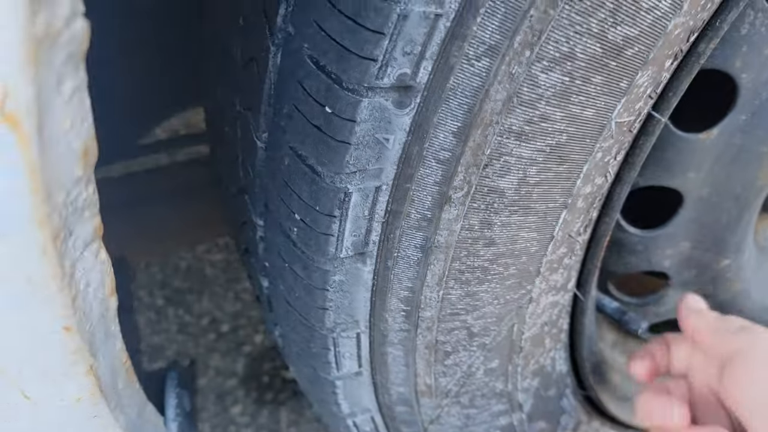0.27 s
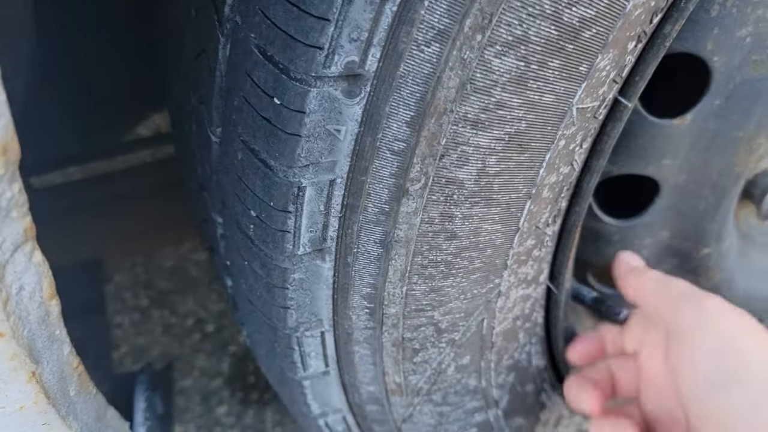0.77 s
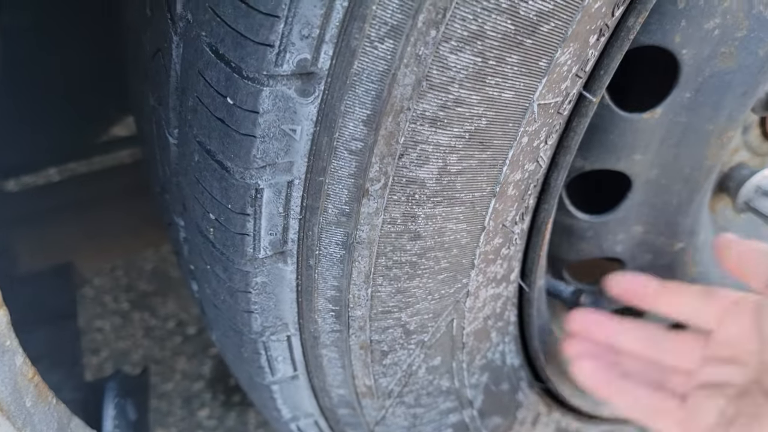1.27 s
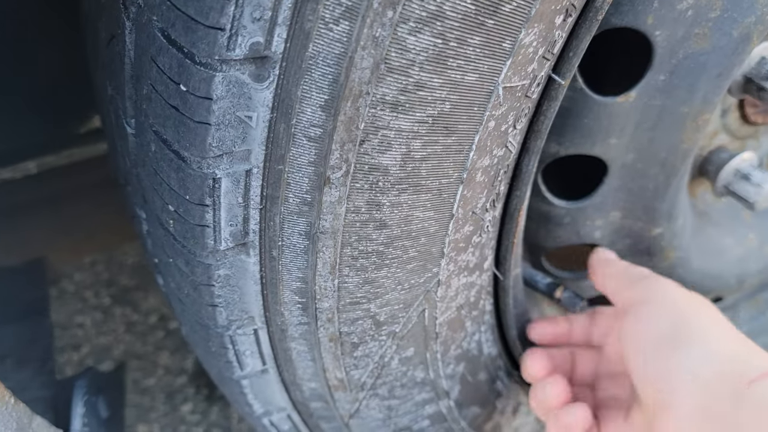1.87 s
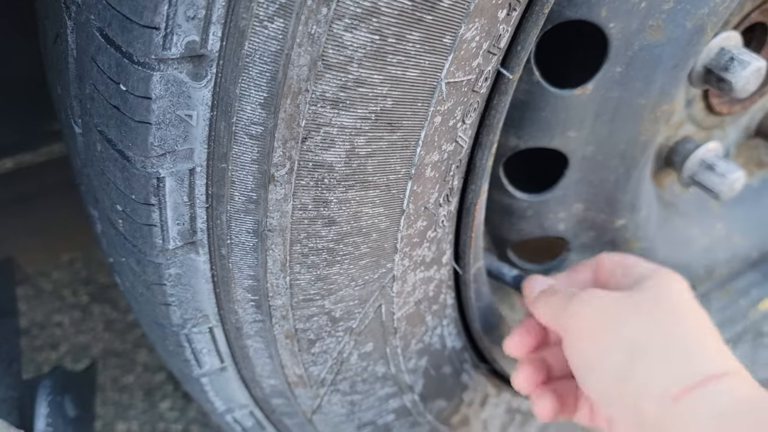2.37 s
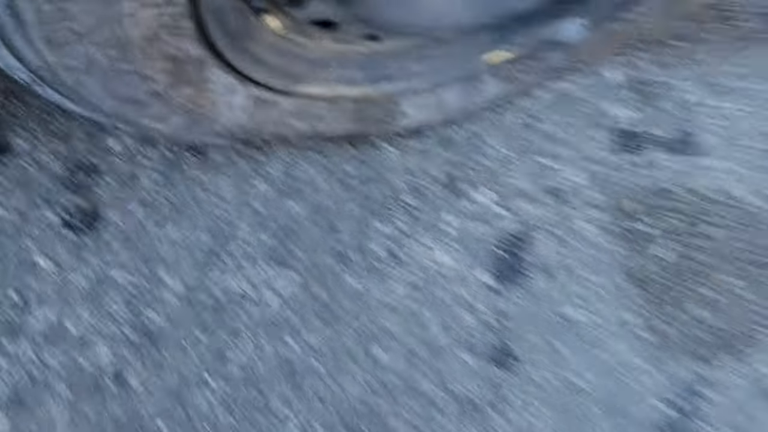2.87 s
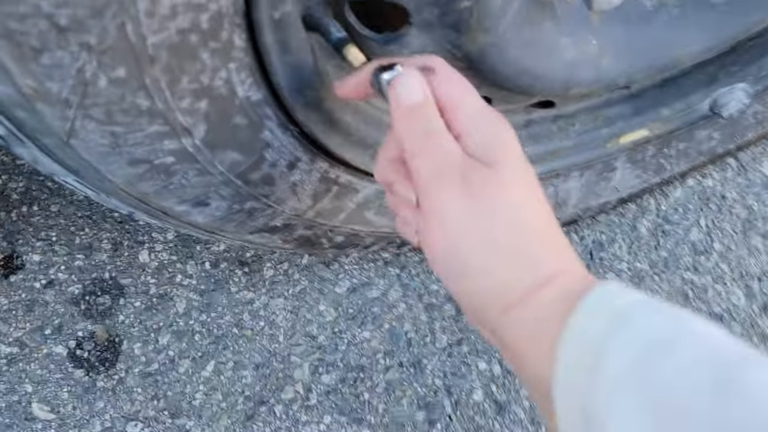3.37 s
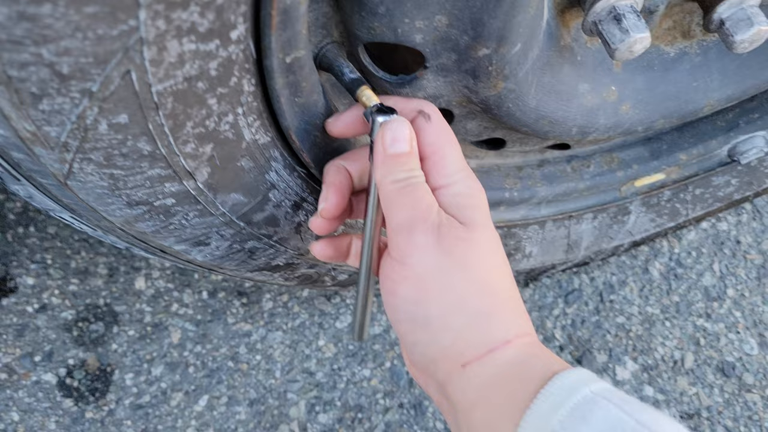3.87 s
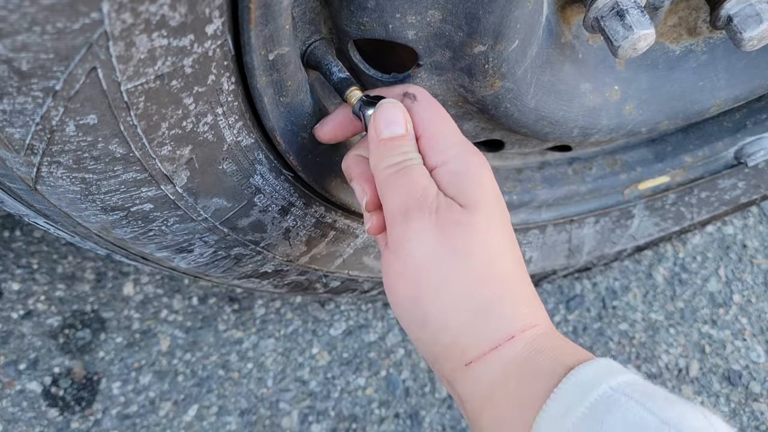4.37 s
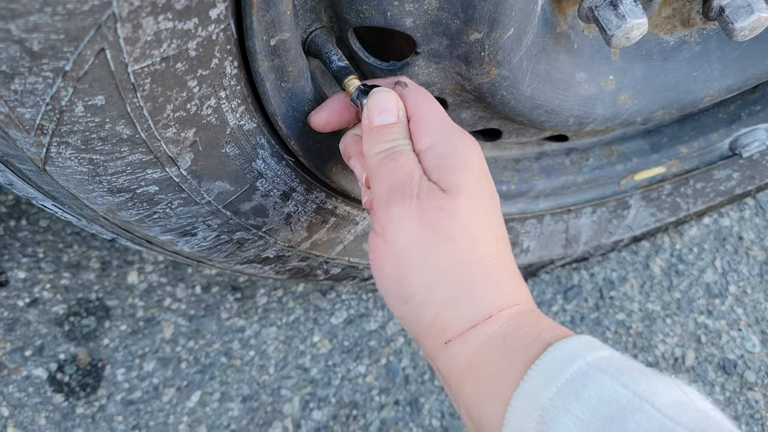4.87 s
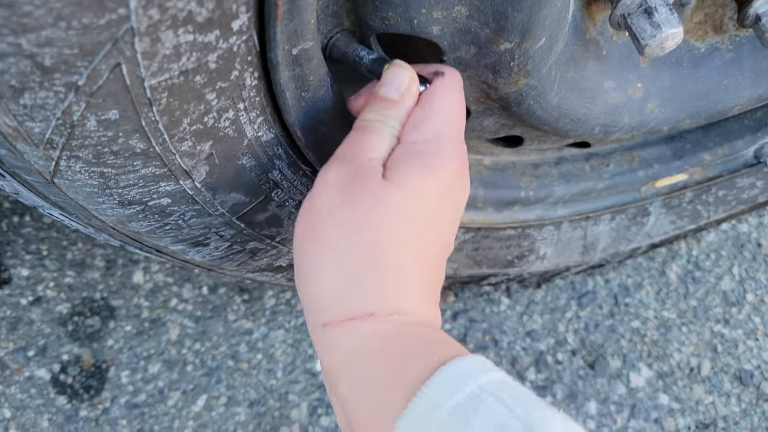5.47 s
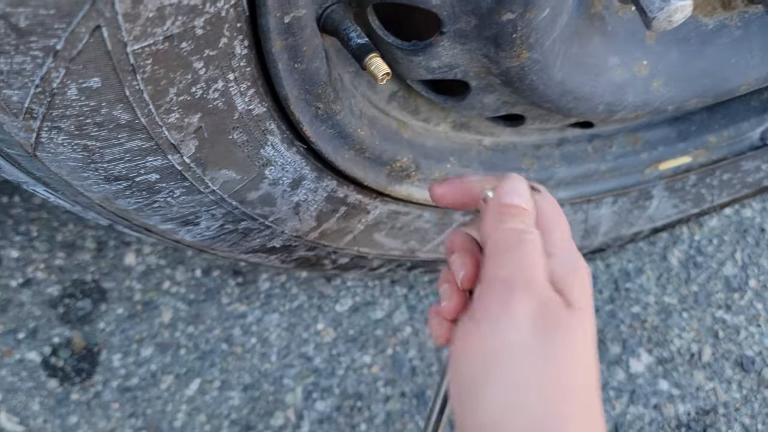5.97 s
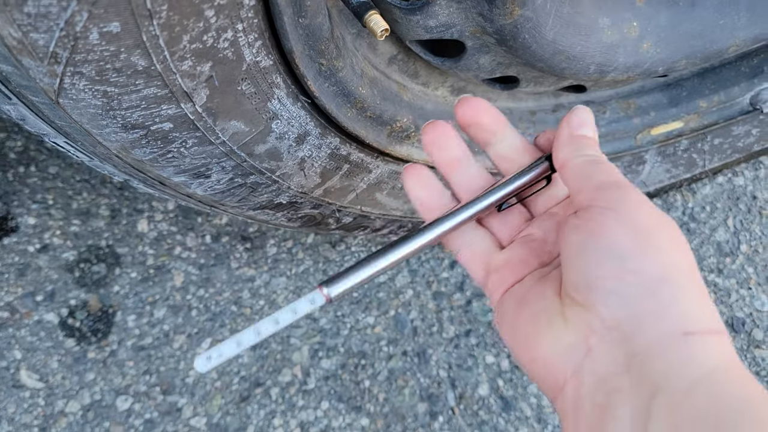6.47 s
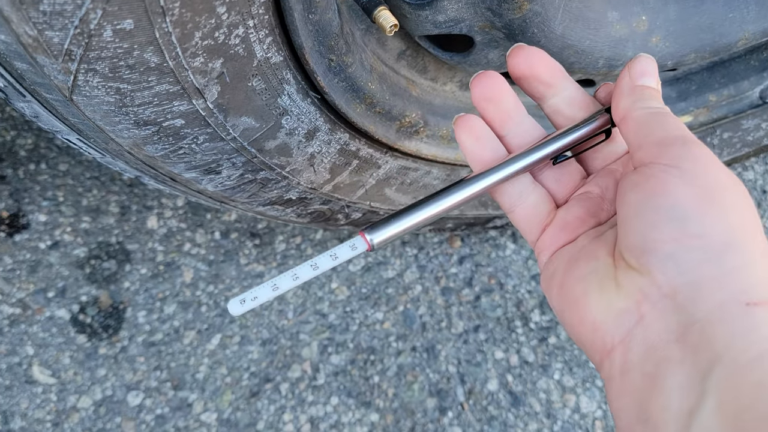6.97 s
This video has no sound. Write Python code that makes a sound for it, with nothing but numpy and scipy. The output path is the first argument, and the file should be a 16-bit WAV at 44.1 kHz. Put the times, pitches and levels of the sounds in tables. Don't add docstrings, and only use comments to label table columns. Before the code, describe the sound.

First a droning, chattering compressor with low engine boom and one bright steel clink right away. After a tiny silent gap the place is calmer: distant traffic rumble, faint cloth rustle, dry little metal clicks. A knock close to the microphone accompanies a bright pressurised hiss with a raspy edge at the tyre valve. A lorry's engine note climbs behind it, then drops. Phone microphone held near the wheel.

```python
import sys
import numpy as np
from scipy import signal
from scipy.fft import rfft, irfft, next_fast_len
from scipy.io import wavfile
from scipy.ndimage import uniform_filter1d

SR = 44100
rng = np.random.default_rng(int(sys.argv[2]) if len(sys.argv) > 2 else 0)


def dump_mix(stems):
    frames = np.atleast_2d(stems).T
    limited = np.clip(frames, -1, 1)
    pcm = np.round(limited * 32767).astype(np.int16)
    wavfile.write(sys.argv[1], SR, pcm)


def ratio(d):
    e = np.asarray(d, float) / 20
    return 10 ** e


N = 318825
T = np.arange(N) / SR
COARSE = T[::16]
SIZE = next_fast_len(N)
HZ = np.maximum(np.fft.rfftfreq(SIZE, 1 / SR), 1)
# start t/s, end t/s
CUT_S = (2.7265, 2.7745)
# start t/s, end t/s
FIRST, SECOND, PRESS = (0, 2.8), (2.7, 7.3), (4.9, 6)


def over_hz(table):
    f, v = np.transpose(table)
    return np.interp(np.log(HZ), np.log(f), v)


def over_time(table):
    s, *cols = np.transpose(table)
    return [np.interp(T, s, c) for c in cols]


def level(x, db):
    return x * ratio(db) / np.sqrt(np.mean(x ** 2))


def walk(rate):
    k = int(len(COARSE) / T[-1] / rate)
    held = np.repeat(rng.standard_normal(len(COARSE) // k + 1), k)
    slow = uniform_filter1d(uniform_filter1d(held, k), k)
    return 1.317 * np.interp(T, COARSE, slow[:len(COARSE)])


def swells(rows, release=1.0):
    t = COARSE
    dbs = []
    for a, b, db, change_db, edge in rows:
        hold_db = db + change_db * np.clip((t - a) / (b - a), 0, 1)
        dbs.append(hold_db - edge * (np.maximum(a - t, 0) + release * np.maximum(t - b, 0)))
    power = np.sum(ratio(np.array(dbs)) ** 2, axis=0)
    return np.interp(T, t, 10 * np.log10(power + 1e-12))


def ports(a, b, lag_ms, colour_db=0):
    # f/Hz, shared part (0 to 1)
    alike = [(40, .985), (100, .995), (170, .99), (250, .86), (400, .88), (700, 0.76), (1500, .6),
             (3000, .58), (7000, .46), (10000, .42), (15000, .7)]
    shared, left = np.clip(over_hz(alike), 0, 1), rfft(a, SIZE)
    turn = 0.16 / (1 + (HZ / 130) ** 2)
    late = np.exp(-1j * (2 * np.pi * HZ * lag_ms / 1000 + turn))
    right = shared * left * late + np.sqrt(1 - shared ** 2) * rfft(b, SIZE)
    return irfft(np.array([left, right]) * ratio(colour_db), SIZE)[:, :N]


def air(spectrum_db, lag_ms, patchy_db, span=(0, 7.3)):
    a, b = int(span[0] * SR), min(int(span[1] * SR), N)
    z = signal.stft(rng.standard_normal((2, b - a)), nperseg=256)[2]
    patch = uniform_filter1d(rng.standard_normal(z.shape[1:]), size=6, axis=0)
    patch = uniform_filter1d(patch, size=12, axis=1)
    x = np.zeros((2, N))
    x[:, a:b] = signal.istft(z * ratio(patchy_db * patch / patch.std()), nperseg=256)[1][:, :b - a]
    return level(ports(*x, lag_ms, spectrum_db), 10 * np.log10((b - a) / N))


def ring(x, hz, t60):
    w, r = 2 * np.pi * hz / SR, np.exp(-np.log(1000) / (t60 * SR))
    return signal.lfilter([np.sin(w)], [1, -2 * r * np.cos(w), r * r], x)


def tone(hz, db, rough_db=1.8):
    cycles = np.cumsum(hz * (1 + 0.00606 * walk(9))) / SR + rng.random()
    db, out = db + rough_db * walk(14), np.zeros(N)
    on = db > -80
    out[on] = np.sqrt(2) * ratio(db[on]) * np.sin(2 * np.pi * cycles[on])
    return out


def rumble():
    # start t/s, end t/s, level/dB, change over the hold/dB, attack/(dB/s)
    booms = [(.2, .7, -25, 0.5, 25), (1.25, 2.72, -28.5, -7, 33), (2.78, 4.9, -34, 2, 40),
             (4.3, 4.36, -28.5, 0, 31), (5.02, 5.04, -27, 0.5, 29), (5.3, 7.3, -37, 3, 18)]
    gusts = [(1, .3, -44, 0, 20), (3, 2.72, -51.5, 0, 20), (1, 5.3, -49, 0, 40), (5, 5.2, -42.5, 0, 27),
             (5.5, 7.3, -54.5, -2, 20)]
    boom_db, wind_db = swells(booms, release=1.5), swells(gusts, release=1.5)
    boom_band = over_hz([(120, -33), (200, -1.5), (300, -1.5), (450, -11.0), (800, -59.0)])
    boom = air(boom_band, lag_ms=0.83, patchy_db=2.0)
    wind_band = signal.butter(2, (22, 40), "band", fs=SR, output="sos")
    wind = signal.sosfilt(wind_band, rng.standard_normal((2, N)))
    wind = wind[0] + .3 * wind[1] * np.array([[1], [-1]])
    return boom * ratio(boom_db - 5.5) + level(wind, 0) * ratio(wind_db + 1.0)


def exhaust_db(hz):
    # f/Hz, half width/Hz, level/dB
    resonances = [(49.4, 4.4, -11), (83.8, 5.8, 1.5), (60.66, 2.8, 2.5), (67.9, 1.55, 2.5), (76, 5, 0),
                  (98.8, 8.1, 6), (125.8, 6.3, -3.5), (136.5, 4.7, -6), (151, 8, -3), (553, 25, 1),
                  (600, 30, 1.5)]
    power = sum(ratio(db) ** 2 / (1 + ((hz - f) / w) ** 2) ** 2 for f, w, db in resonances)
    return 10 * np.log10(ratio(-18.5) ** 2 + power)


def traffic():
    # t/s, firing f/Hz, load level/dB
    lorry = [(3.7, 36.76, -37), (4.13, 38.63, -33.5), (4.3, 42.28, -19.5), (4.68, 50.1, -17),
             (5.11, 61.57, -21), (5.67, 76.53, -20), (5.9, 79.5, -27.5), (6.15, 81.4, -40.5),
             (6.48, 79.4, -25), (6.75, 62.4, -32.5), (7.23, 63.1, -32)]
    # multiple, level/dB
    orders = [(1, -1), (2, -3.5), (3, -10), (7, -23), (8, -25)]
    # start t/s, end t/s, f at start/Hz, glide/(Hz/s), level/dB
    passing = [(0, 1.676, 70.7, 5, -23), (1.8, 2.8, 78.7, 3.5, -24), (3, 3.12, 210, 3.5, -37.5),
               (3.5, 4.15, 200.5, 4.5, -33), (4.5, 5.45, 202, 8, -37), (3.25, 3.65, 346, 24, -35),
               (3, 3.1, 62, 41, -39), (1.5, 3.75, 99, -4.5, -38.5), (4.5, 4.94, 98, 5, -25),
               (6.5, 6.13, 106.7, 4, -27.5), (6.5, 6.47, 114, 14.5, -28.5), (7, 7.5, 123, 21.5, -37.5),
               (7, 7.03, 194, 8, -35), (5.5, 5.05, 310, 2.5, -37), (5.5, 5.34, 258, 2, -34),
               (4, 3.6, 340, 10, -40), (6, 6.6, 195, 2.5, -41)]
    # start t/s, end t/s, level/dB, change over the hold/dB, attack/(dB/s)
    rushes = [
        (6.2, 6.41, -44, 0.86, 36.2),
        (6.6, 7.3, -57, -1.03, 40),
    ]
    puffs = [(5.834, 5.836, -36, 0, 1100)]
    # f/Hz, level/dB per Hz
    gas_colour = [(600, -26), (1100, 2.5), (1600, -11.5), (2000, 2), (2300, -3.5), (2800, 6), (3200, -4.5),
                  (3700, -2.5), (4500, -5.5), (5500, -14.5), (6800, -15), (9000, -29), (13000, -25.5),
                  (15700, -28)]
    whirrs = [(4.6, 5.2, -40, 0, 9.1)]

    hz, load_db = over_time(lorry)
    tones = sum(tone(k * hz, load_db + db + exhaust_db(k * hz)) for k, db in orders)
    tones = tones * np.clip((T - lorry[0][0]) / 0.069, 0, 1)
    for a, b, f, glide, db in passing:
        same_moment = (T > CUT_S[0]) == (a > CUT_S[0])
        fade_db = swells([(a, b, db, 0, 48)])
        tones = tones + same_moment * tone(f + glide * (T - a), fade_db)
    gas = ratio(swells(rushes, release=2.4) + 5.0) + ratio(swells(puffs, release=0.22) + 3.5)
    rush = air(over_hz(gas_colour), lag_ms=0.558, patchy_db=2.0, span=SECOND) * gas * (T > PRESS[0])
    whirr_band = -40 * np.abs(np.log2(HZ / 552))
    whirr = air(whirr_band, lag_ms=0.57, patchy_db=5.0, span=SECOND) * ratio(swells(whirrs))
    return ports(tones, np.roll(tones, 150), lag_ms=0.51) + rush + whirr


def street():
    # f/Hz, level/dB per Hz
    far_colour = [(25, -26), (65, 4), (130, -5), (220, -11.5), (375, -14.5), (500, -16.5), (650, -20.5),
                  (1000, -16), (1750, -30.5), (3000, -34.5), (5700, -57), (9000, -66.5), (13000, -77),
                  (15700, -66)]
    # start t/s, end t/s, level/dB, change over the hold/dB, attack/(dB/s)
    rustles = [
        (3.05, 3.37, -59, -3.5, 30),
        (3.6, 4.1, -65.5, -8, 85),
        (6.1, 6.43, -58.5, 5, 95),
    ]
    far_db = -28.5 - 1.77 * np.maximum(T - 4.8, 0)
    far = air(over_hz(far_colour), lag_ms=0.5, patchy_db=1.0, span=SECOND) * ratio(far_db)
    cloth = over_hz([(2000, -16), (4000, -1.5), (7500, 3.0), (9500, -12.5), (13500, 1), (15800, 0), (16000, -52.5)])
    rustle_db = swells(rustles, release=1.8)
    return far + air(cloth, lag_ms=.3, patchy_db=1.8, span=SECOND) * ratio(rustle_db)


def compressor():
    shaft_hz, mains_hz, mains_db = 28.76, 119.9, -33
    # multiple, level/dB
    crank = [(2, -27), (4, -26.5), (5, -41), (6, -41), (7, -39.5), (8, -36), (9, -46), (10, -48.5),
             (11, -42.5), (12, -47), (18, -52)]
    # f/Hz, width/Hz, level/dB
    casing_modes = [(948, 45, -2.5), (1188, 67, 5), (1363, 74, -4), (1590, 18, -8), (1758, 110, -6),
                    (1893, 30, -3), (1980, 35, -3.5), (2087, 43, -0.5), (2210, 31, 4.5)]
    # f/Hz, t60/s, level/dB
    reed_modes = [(1192, 0.045, -46.5), (1224, 0.085, -49.5), (2227, 0.11, -47.5), (2087, .06, -64),
                  (1990, .05, -51.5)]
    # f/Hz, level/dB per Hz
    roar_colour = [(25, -30), (60, -8), (140, -9), (230, -19.5), (420, -21.5), (620, -26.5), (800, -19.5),
                   (1100, -34.5), (2200, -29), (4700, -40.5), (7300, -35), (9300, -43), (12500, -29.5),
                   (15700, -31.5)]

    turn = np.cumsum(shaft_hz * (1 + 0.001466 * walk(1.51))) / SR
    n = int(FIRST[1] * SR)
    hum = np.zeros(N)
    for k, db in crank:
        strength = np.sqrt(2) * ratio(db + 2.3 * walk(8)[:n])
        hum[:n] += strength * np.sin(2 * np.pi * (k * turn[:n] + rng.random()))
    hum = hum + np.sqrt(2) * ratio(mains_db) * np.cos(2 * np.pi * mains_hz * T)

    beats = np.flatnonzero(np.diff(np.floor(2 * turn)))
    jitter = .00005 * SR * rng.standard_normal(len(beats))
    beats = beats + np.round(jitter).astype(int)
    knock = np.zeros(N + SR)
    knock[beats] = ratio(-7 * (np.arange(len(beats)) % 2) + 2.8 * rng.standard_normal(len(beats)))
    knock = knock[:N]
    reeds = sum(level(ring(knock, hz, t60), db) for hz, t60, db in reed_modes)
    reeds = reeds * ratio(1.5 * (T - 2.5))

    stroke = np.cos(4 * np.pi * turn)
    rattle = (1 + 0.087 * stroke) * rng.standard_normal((2, N))
    drive = level(knock, -54.5) + level(rattle, -37.5)
    casing = sum(ratio(db) * np.sqrt(w) * ring(drive, f, 4.35 / w) for f, w, db in casing_modes) * ratio(-45.5)
    puff = 1 + 0.12 * stroke + 0.13 * np.cos(2 * np.pi * turn) + 0.071 * np.cos(8 * np.pi * turn)
    roar = air(over_hz(roar_colour), lag_ms=0.542, patchy_db=1.4, span=FIRST) * puff * ratio(-25.5 - 0.25 * T)
    return ports(hum, np.roll(hum[::-1], n), lag_ms=0.18) + ports(*(casing + reeds), lag_ms=0.59) + roar


def clink():
    # f/Hz, peak level/dB, t60/s, left minus right/dB, delay/s
    modes = [(3020, -20.5, 0.18, -14, 0.0031), (3330, -14, 0.045, -1, 0.0035),
             (3940, -20, 0.079, 3, 0.0029), (4640, -22, 0.24, -0.5, 0.00027), (6500, -29, 0.083, -3, .006),
             (7500, -19.5, 0.12, -10, 0.0051), (14000, -13.5, 0.023, -7.5, 0)]
    t = T[:SR // 2]
    hit = ratio(-19) * t / .002 * np.exp(1 - t / .002) * rng.standard_normal((2, len(t)))
    hit = hit - uniform_filter1d(hit, size=15)
    for hz, db, t60, pan_db, delay in modes:
        u = np.maximum(t - delay, 0)
        swing = (1 - np.exp(-u / 0.00068)) * ratio(db - 60 * u / t60)
        pan = ratio(np.array([[pan_db], [-pan_db]]) / 2)
        hit = hit + swing * pan * np.sin(2 * np.pi * (hz * u + np.array([[0], [.12]])))
    out = np.zeros((2, N))
    out[:, int(.1252 * SR):][:, :len(t)] = hit
    return out


def gauge():
    # t/s, peak level/dB, ring f/Hz, ring time/s, left minus right/dB
    ticks = [(2.9527, -43, 5500, .002, 7), (2.9741, -42, 6500, .002, 3), (3.12, -25, 4540, 0.0032, 2.5),
             (3.1895, -50, 13500, .001, 0), (3.2005, -24, 4400, 0.0031, 4), (3.369, -46, 6510, .004, 3),
             (3.6, -55, 14000, .003, 0), (3.6254, -53, 8100, .002, 2), (3.683, -54, 8000, .001, 2),
             (3.776, -46, 13500, 0.0023, -2), (3.8135, -45, 7500, 0.0018, -5),
             (6.84, -58, 12970, 0.0042, -4)]
    # t/s, peak level/dB, ring f/Hz,
    # ring time/s, left minus right/dB
    knocks = [(3.241, -31, 2270, 0.0027, 0), (3.244, -37, 4150, 0.03, -4), (3.258, -38, 2200, .005, -2),
              (3.591, -31.5, 2700, .002, 8), (4.093, -32, 2260, 0.0032, 3), (4.2, -62, 10440, 0.17, -7),
              (5.995, -40.5, 5500, 0.013, -9.5)]
    # t/s, level/dB
    thump = (5.157, -6.5)
    out, t = np.zeros((2, N)), T[:SR // 8]
    for rows, crack_db in (ticks, -12), (knocks, -27):
        grains = rng.standard_normal((len(rows), 2, len(t)))
        for (s, db, hz, ring_s, pan_db), grain in zip(rows, grains):
            grain = grain[0] + 0.31 * grain
            strike = 5 * (t == 0) + grain * np.exp(-t / ring_s)
            tube = ring(strike, hz, 28 / hz)
            fade = np.exp(-t / 0.0006) + ratio(-9) * np.exp(-t / 0.0058)
            crack = uniform_filter1d(grain, size=2) * fade
            tick = tube / np.abs(tube).max() + ratio(crack_db) * crack
            out[:, int(s * SR):][:, :len(t)] += ratio(db + np.array([[pan_db], [-pan_db]]) / 2) * tick
    thumb = np.sin(2 * np.pi * 700 * t) * np.exp(-t / 0.00038)
    out[0, int(thump[0] * SR):][:len(t)] += ratio(thump[1]) * thumb
    return out


def valve():
    # start t/s, end t/s, level/dB, change over the hold/dB, attack/(dB/s)
    leaks = [
        (5.005, 5.07, -51, 19, 1200),
        (5.13, 5.452, -17, -5, 300),
        (5.5, 5.6, -38.5, -2, 299),
        (5.635, 5.78, -37, 0, 600),
        (5.788, 5.808, -24.5, -1, 750),
    ]
    gaps = [(5.1, 5.335, -47, 1, 500), (5.347, 5.365, -33, 2, 1200), (5.372, 5.398, -26.5, -1, 450),
            (5.415, 5.45, -32, 0, 500), (5.47, 5.49, -43, -2, 700), (5.785, 5.81, -43.5, 1, 1203)]
    # f/Hz, level/dB per Hz
    jet_colour = [(900, -40), (1500, -30), (2600, -15), (4000, -9), (5500, -10.5), (7600, -7.5),
                  (8300, -14), (8900, -9.5), (10600, -13.5), (12000, -1.5), (13000, 3), (14200, 0.5),
                  (15700, -3.5)]
    # f/Hz, level/dB per Hz
    rasp_colour = [(500, -44.5), (800, -5), (950, -12), (1170, -3.5), (1400, 2.5), (1900, -1), (2600, -5.5),
                   (3300, -17.5), (5000, -52)]
    # t/s, notch f/Hz
    notch_path = [(5.2, 3900), (5.31, 4030), (5.4, 5606), (5.53, 6500), (5.8, 6540)]

    whistle_db, rasp_db = swells(leaks, release=1.1), swells(gaps, release=0.99)
    body_db = swells(leaks, release=0.83) - 7.5 + 2.7 * np.clip((rasp_db + 39.5) / 12, 0, 1)
    top_db = 7 + 0.8 * np.clip(whistle_db - leaks[1][2], -26, 0) * (T > leaks[1][0])
    step = 40 * np.tanh(np.log(HZ / 9600) * 12)
    whistle = air(over_hz(jet_colour) + np.minimum(step, 0), lag_ms=.4, patchy_db=0.6, span=PRESS)
    top = irfft(rfft(whistle, SIZE) * np.clip((HZ - 13500) / 1200, 0, 1), SIZE)[:, :N]
    whistle = whistle + (ratio(top_db) - 1) * top
    body = air(over_hz(jet_colour) - np.maximum(step, 0), lag_ms=0.386, patchy_db=2.4, span=PRESS)
    late = T - .5 / over_time(notch_path)[0]
    body = body + ratio(-11.5) * np.array([np.interp(late, T, side) for side in body])
    barrel_db = -20 * np.log10(np.abs(1 - .38 * np.exp(-2j * np.pi * HZ / 576)))
    rasp = air(over_hz(rasp_colour) + barrel_db, lag_ms=0.29, patchy_db=0.5, span=PRESS)
    rasp = rasp * ratio(np.array([[2.5], [-2.5]]))
    flutter = 0.91 * walk(60) + 1.2 * walk(12) - 4000 * np.maximum(4.99 - T, 0)
    hiss = whistle * ratio(whistle_db + 4.0 + flutter) + body * ratio(body_db + 2.0 + flutter)
    return hiss + rasp * ratio(rasp_db + 5.5 + flutter)


def scene():
    before = np.clip((CUT_S[0] - T) / 0.00079, 0, 1)
    after = np.clip((T - CUT_S[1]) / 0.0012, 0, 1)
    forecourt = compressor() + clink()
    wheel = street() + gauge() + valve()
    return before * forecourt + after * wheel + (before + after) * (traffic() + rumble())


def band_limit(x):
    return signal.sosfilt(signal.butter(12, 16820, fs=SR, output="sos"), x)


def record(dry):
    # f/Hz, left minus right/dB
    port_tilt = [(100, -0.5), (400, 0.5), (700, -1.5), (1700, 4), (4000, 5), (7000, 6.5), (9000, 8.5),
                 (11000, 0.5), (13000, -7), (16000, 0)]
    tilt = over_hz(port_tilt) / 2
    cut_db = -np.clip((HZ - 15900) / 8, 0, 60)
    x = irfft(rfft(dry, SIZE) * ratio(np.array([tilt, -tilt])), SIZE)
    mix = irfft(rfft(np.tanh(x)) * ratio(cut_db), SIZE)[:, :N]
    return band_limit(mix)


dry = scene()
out = record(dry)
dump_mix(out)
```